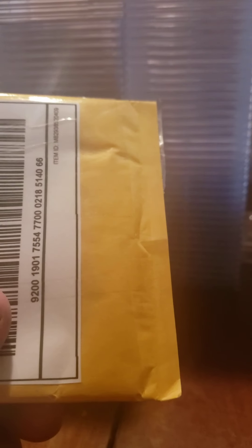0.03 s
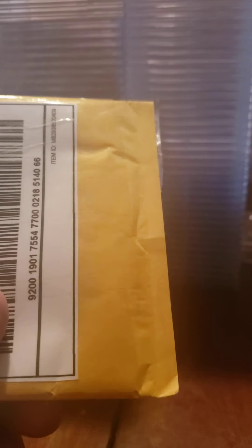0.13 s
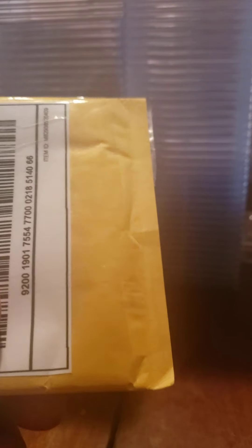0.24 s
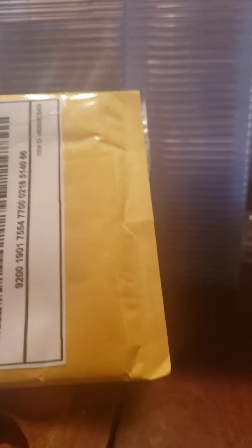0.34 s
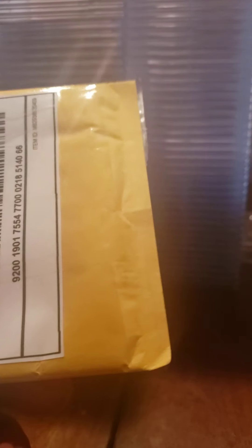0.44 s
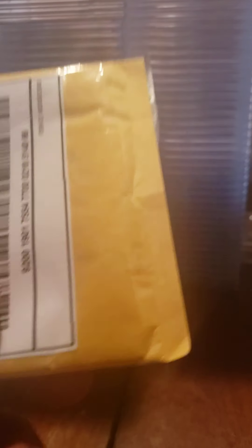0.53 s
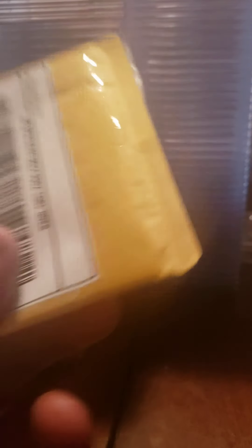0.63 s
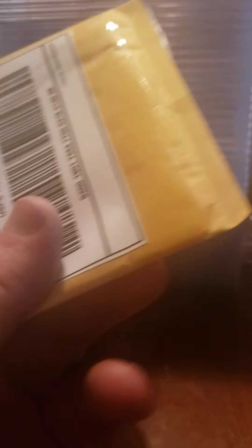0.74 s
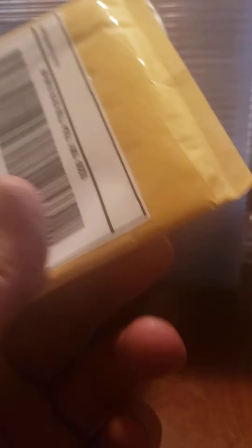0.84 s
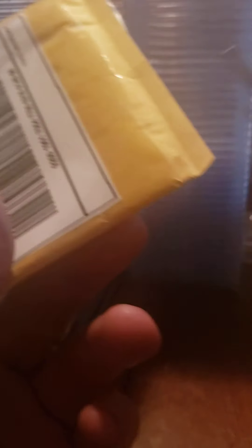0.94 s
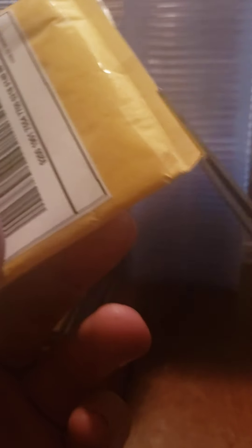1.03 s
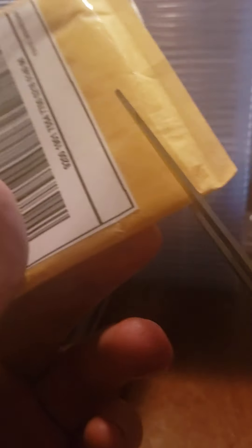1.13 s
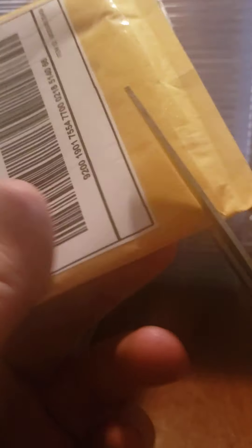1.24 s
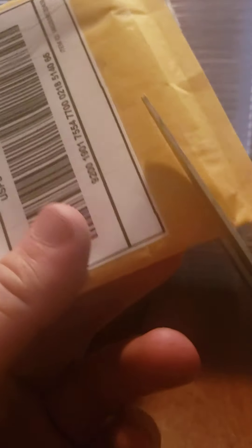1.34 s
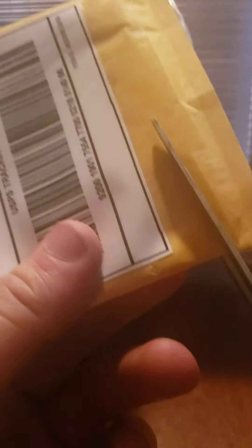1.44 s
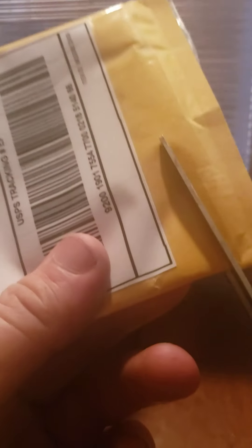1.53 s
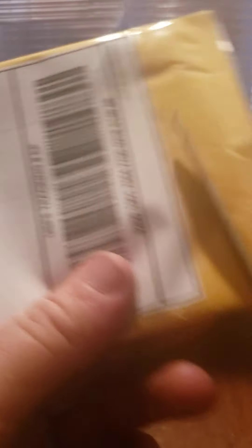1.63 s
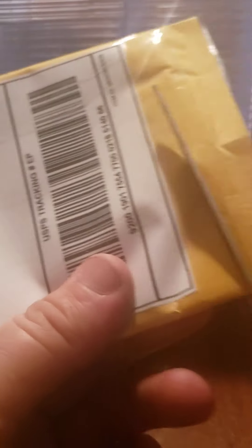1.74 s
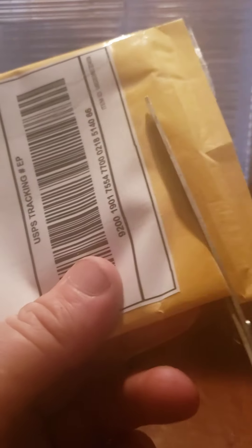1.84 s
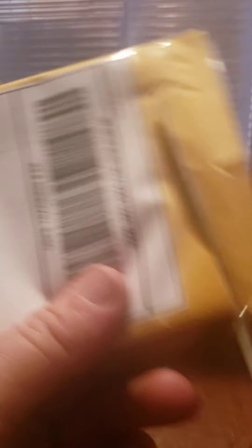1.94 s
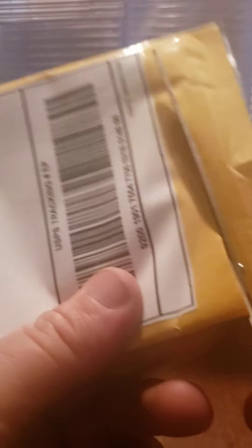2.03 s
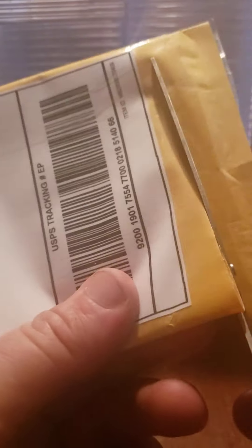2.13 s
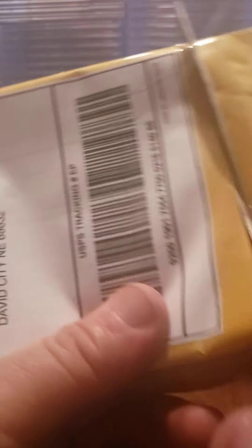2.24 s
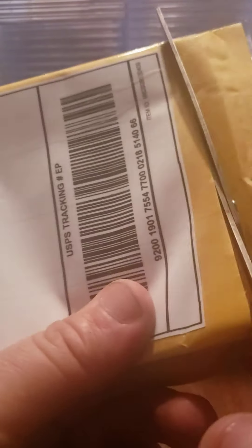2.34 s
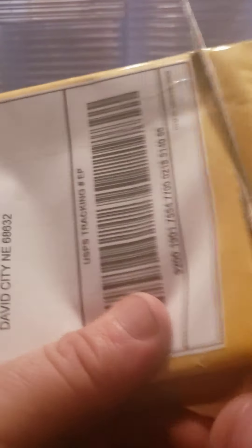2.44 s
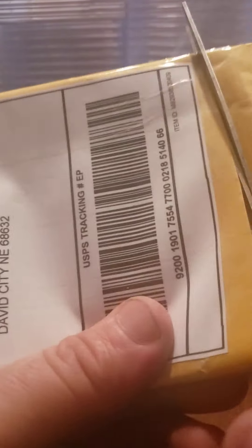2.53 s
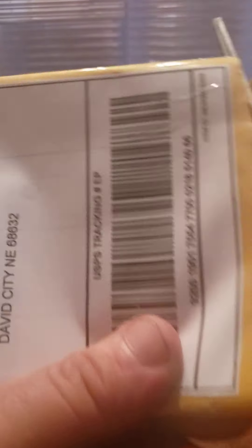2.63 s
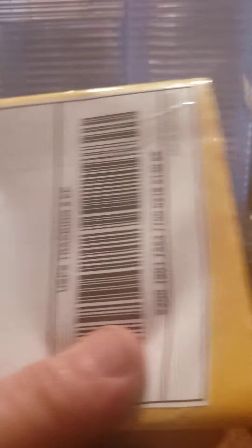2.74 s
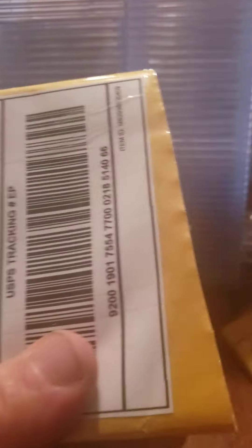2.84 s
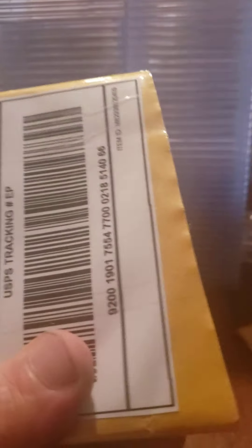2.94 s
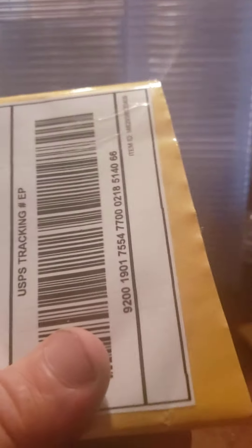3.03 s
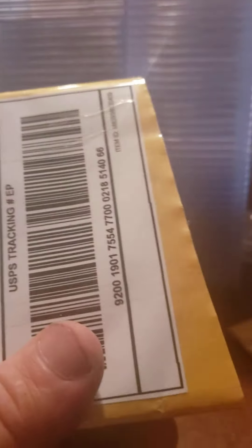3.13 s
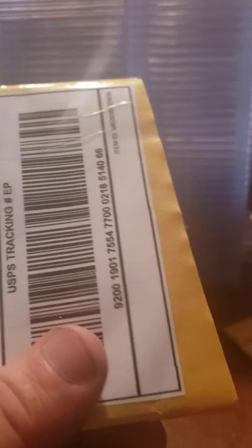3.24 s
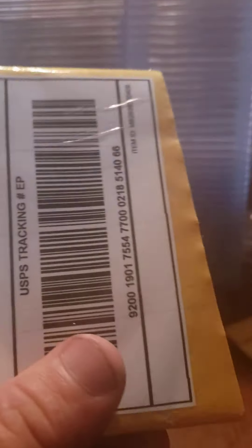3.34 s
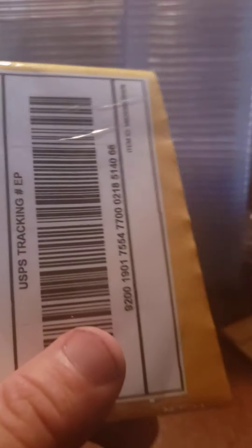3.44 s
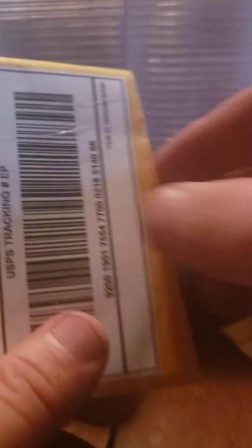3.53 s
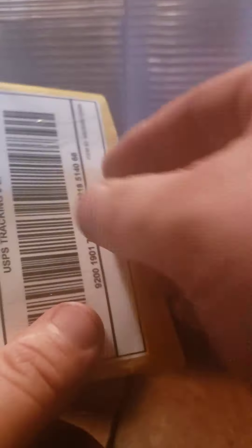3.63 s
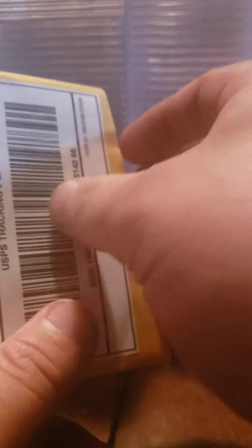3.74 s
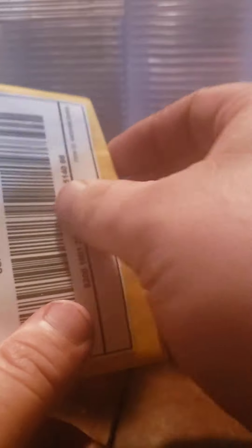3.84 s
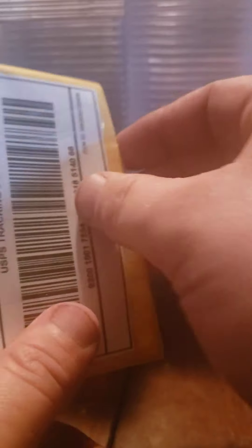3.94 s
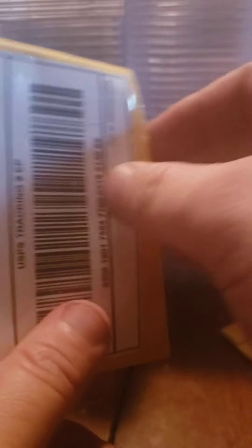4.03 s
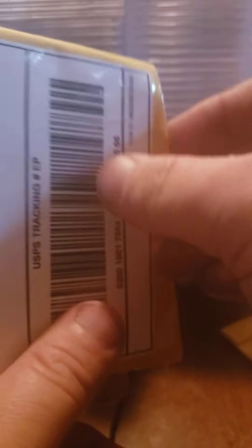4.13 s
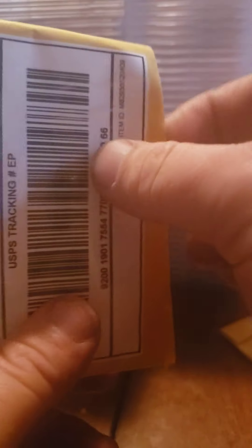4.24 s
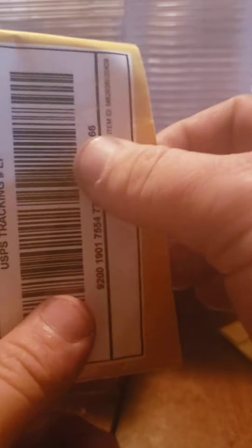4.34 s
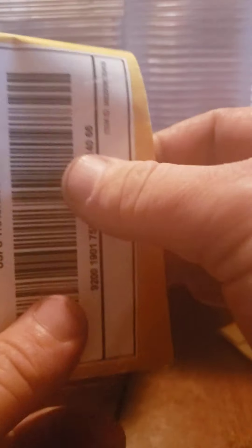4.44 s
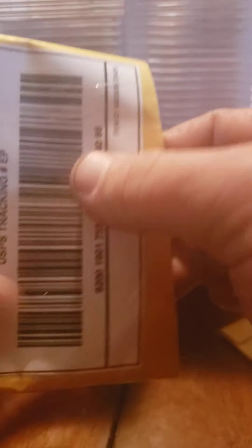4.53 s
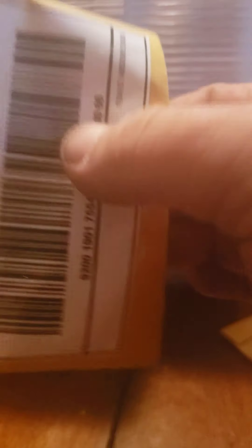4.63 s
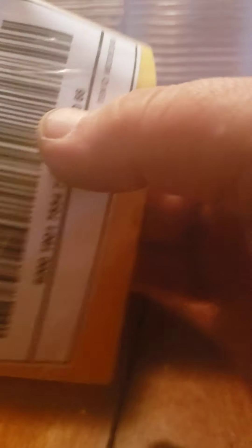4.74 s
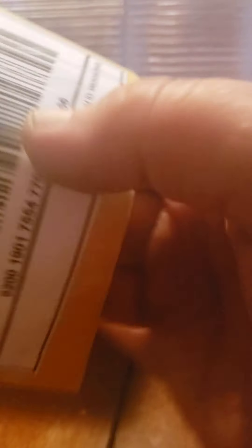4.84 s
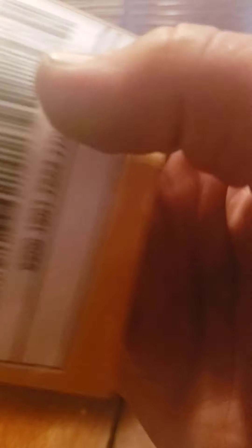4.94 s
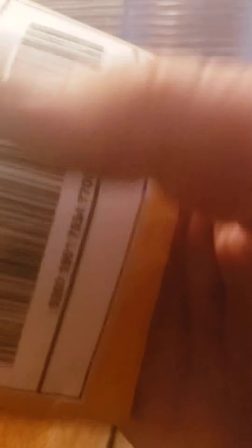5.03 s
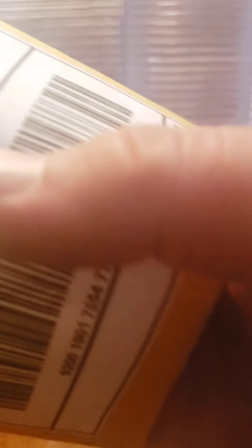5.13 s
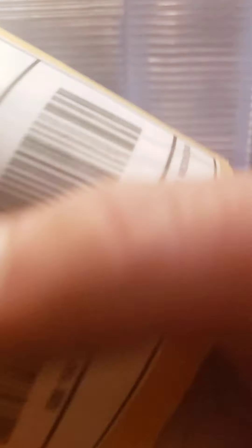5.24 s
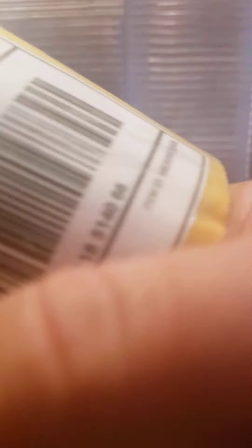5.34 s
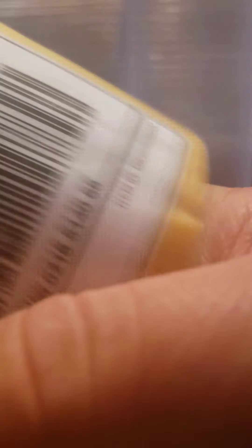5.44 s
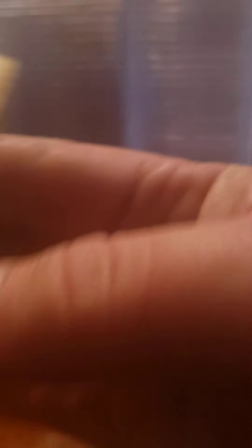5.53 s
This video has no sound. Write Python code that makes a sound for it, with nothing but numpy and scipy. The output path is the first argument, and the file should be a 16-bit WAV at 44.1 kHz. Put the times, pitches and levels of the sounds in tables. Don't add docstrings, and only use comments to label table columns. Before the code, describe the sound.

Scissors snip through a stiff padded paper envelope, clatter down on a wooden table, then hands crinkle and tug the packet in a quiet room.

```python
import sys
import numpy as np
from scipy import signal
from scipy.fft import rfft, irfft, next_fast_len
from scipy.io import wavfile
from scipy.ndimage import uniform_filter1d, map_coordinates

SR = 44100
rng = np.random.default_rng(int(sys.argv[2]) if len(sys.argv) > 2 else 0)


def boost_factor(decibels):
    exponent = np.asarray(decibels, float) / 20
    return 10 ** exponent


def digitize_waveform(pressure):
    field = np.atleast_2d(pressure).T
    bounded = np.clip(field, -1, 1)
    quanta = np.round(bounded * 32767).astype(np.int16)
    wavfile.write(sys.argv[1], SR, quanta)


N = 246253
T = np.arange(N) / SR


def unit(x):
    return x / np.sqrt(np.mean(x ** 2))


def colour(x, points):
    hz, db = np.transpose(points)
    n = next_fast_len(x.shape[-1], True)
    f = np.arange(n // 2 + 1) * SR / n + 1
    gain = boost_factor(np.interp(np.log(f), np.log(hz), db, left=-80))
    return irfft(rfft(x, n) * gain, n)[..., :x.shape[-1]]


def walk(rate):
    k = int(SR / rate)
    steps = np.repeat(rng.standard_normal(N // k + 1), k)
    return 1.2 * uniform_filter1d(steps, k)[:N]


def grains(rate, spread_db, grain_ms, points):
    chance = rng.random((2, N))
    sizes = (chance[0] < rate / SR) * boost_factor(-2 * spread_db * np.log(1.03 - chance[1]))
    pole = np.exp(-2000 / (grain_ms * SR))
    power = signal.lfilter([1], [1, -pole], sizes) + 0.35
    return unit(colour(np.sqrt(power) * rng.standard_normal(N), points))


def ring(modes, push_ms):
    t = np.arange(int(SR * max(mode[2] for mode in modes))) / SR
    y = 0
    for hz, db, t60 in modes:
        decay = np.exp(-np.log(1000) * t / t60)
        y = y + boost_factor(db) * decay * np.sin(2 * np.pi * hz * t + 6 * rng.random())
    y = y * (1 - np.exp(-t * 1000 / push_ms)) ** 2
    return y / np.abs(y).max()


def crack(bright_db, rise_ms, fall_ms):
    ms = np.arange(4096) * 1000 / SR
    shape = np.minimum(ms / rise_ms, 1) ** 2 * np.exp(-np.maximum(ms - rise_ms, 0) / fall_ms)
    bins = rfft(shape * rng.standard_normal(len(ms)))
    burst = irfft(bins / np.abs(bins) ** 0.3) * np.minimum(3 * shape, 1)
    bumps = 2.3 * rng.standard_normal(4)
    y = colour(burst, [(500, -47), (1300, bumps[0]), (2800, bumps[1]), (5500, 0.41 * bright_db + bumps[2]),
                       (9000, bright_db - 2), (13000, bright_db + bumps[3]),
                       (16000, bright_db - 5.5), (17000, -75)])[:2048]
    return y / np.abs(colour(y, [(1400, 0), (7000, 0), (7500, -60)])).max()


def add(track, s, sound):
    i = int(s * SR)
    track[i:i + len(sound)] += sound[:N - i]


# (time [s], rubbing [dB], bending [dB])
HOLDING = [(0, -60, -59), (.618, -65, -63), (.95, -64.5, -65), (1.08, -62, -100), (1.175, -85, -83),
           (1.19, -65, -74), (1.326, -55, -68), (1.4, -53, -72), (1.45, -43.5, -66), (1.6, -67, -91),
           (2.152, -67, -71), (2.78, -56, -65), (3.11, -60.5, -69.5), (3.17, -66.5, -77),
           (3.2, -62.5, -63.5), (3.279, -57.5, -65), (3.55, -73.5, -78), (5.15, -48.5, -52.5),
           (5.58, -47.5, -58)]
# (time [s], length [s], shear [dB], bending [dB])
SCISSOR_STROKES = [(1.446, 0.13, -49.5, -63), (1.472, 0.028, -35.5, -49.5), (1.53, 0.013, -40, -55.5),
                   (1.572, 0.0096, -41, -53.5), (1.656, 0.092, -38, -51.5), (1.775, 0.029, -41, -55.5),
                   (1.812, 0.08, -39, -41.5), (1.984, 0.068, -35.5, -45.5), (2.085, 0.084, -38.5, -41),
                   (2.232, 0.066, -36.5, -43), (2.318, 0.068, -43.5, -45), (2.329, 0.01, -32, -43),
                   (2.479, .031, -42, -48), (2.536, 0.015, -46, -48.5), (2.562, 0.01, -51, -56),
                   (2.578, 0.016, -39, -53.5), (2.61, 0.0083, -42.5, -61), (2.658, 0.05, -66, -47)]
# (time [s], length [s], rubbing [dB], bending [dB])
FINGER_SLIDES = [(0, 0.081, -62.5, -65.5), (.215, 0.019, -58, -54.5), (.252, 0.015, -51, -54),
                 (.305, .018, -48, -47), (.374, 0.053, -51, -51), (.776, 0.053, -54, -62.5),
                 (2.813, 0.058, -67, -66), (2.886, 0.1, -58, -71), (3.021, 0.0088, -45.5, -58),
                 (3.083, 0.022, -73, -64), (3.179, 0.04, -62, -62), (3.614, 0.072, -62, -79),
                 (3.769, 0.091, -62, -67), (3.878, 0.044, -53, -61.5), (3.991, 0.041, -60, -58),
                 (4.052, 0.034, -49.5, -48), (4.098, 0.036, -46, -51), (4.195, 0.059, -60.5, -78),
                 (4.349, .13, -49.5, -49.5), (4.519, 0.081, -61, -52.5), (4.631, 0.045, -52.5, -72),
                 (4.685, 0.097, -51, -60.5), (4.816, 0.13, -48, -50.5), (4.951, 0.091, -44.5, -52.5),
                 (5.103, 0.063, -47.5, -55.5), (5.178, 0.12, -48.5, -51), (5.495, 0.3, -47, -56)]


def motion():
    rise_ms, fall_ms, arch_db = 3.5, 8, 5
    s, rub_db, bend_db = np.transpose(HOLDING)
    held = (rub_db, bend_db, bend_db - 8, bend_db - 7.5)
    level = boost_factor(np.array([np.interp(T, s, db) for db in held]))
    level = level * np.where((T > 3.28) & (T < 3.55), 0.3, 1)
    for strokes, drum_db, body_db in ((SCISSOR_STROKES, 1.5, -16.5), (FINGER_SLIDES, -1, -5)):
        for s, length, rub_db, bend_db in strokes:
            edge = np.minimum((T - s) * 1000 / rise_ms, (s + length - T) * 1000 / fall_ms)
            arch = boost_factor(arch_db * (0.3 - np.clip(2 * (T - s) / length - 1, -1, 1) ** 4))
            peaks = boost_factor(np.array([[rub_db], [bend_db], [bend_db + drum_db], [bend_db + body_db]]))
            level = level + peaks * np.exp(np.clip(edge, -30, 0)) * arch
    return level


# (frequency [Hz], level [dB per Hz])
SHEAR_COLOUR = [(1760, -5), (3000, -1), (4140, 1), (4600, 1), (8870, -5.5), (11600, 1.5), (15100, -1),
                (16200, -34.5), (16500, -47)]
# (frequency [Hz], level [dB per Hz])
CRINKLE_COLOUR = [(900, -37), (1300, 3.5), (1750, 5), (2300, 4), (2700, 5.5), (3500, -1), (4500, -13)]
# (frequency [Hz], level [dB per Hz])
DRUM_COLOUR = [(350, -51.5), (480, -2), (600, 2), (740, 1.5), (900, -1.5), (1050, -8.5), (1400, -12.5)]
# (time [s], level above 9 kHz [dB])
TAPE_SHEEN = [(0, -8), (.22, 0), (.33, -4), (.38, 9), (.42, 3), (.5, -21), (.8, 9.5), (.95, -22), (1.5, -4),
              (1.8, -0.5), (3.8, -5.5), (5.6, -3.5)]


def paper(shear, crinkle, drum):
    jerk = walk(70)
    fibres = grains(1300, 2.7, 0.5, SHEAR_COLOUR)
    sheen = boost_factor(np.interp(T, *np.transpose(TAPE_SHEEN)))
    fibres = fibres + (sheen - 1) * colour(fibres, [(7000, -40), (9500, 0)])
    shear = shear * boost_factor(1.8 * jerk + 1.6 * walk(200) - 0.5) * fibres
    crinkle = crinkle * boost_factor(2.5 * jerk + 2 * walk(120) - 2) * grains(260, 4.2, 0.6, CRINKLE_COLOUR)
    drum = drum * boost_factor(1.5 * jerk + 1.8 * walk(60)) * grains(500, 2, 1.5, DRUM_COLOUR)
    return shear + crinkle, drum


# (time [s], crack [dB], brightness [dB], panel [Hz], panel [dB])
CREASE_SNAPS = [(.2515, -31, 0, 764, -37), (.3105, -38, 9, 750, -39), (.413, -21, 11, 765, -28.5),
                (1.5145, -28, -6, 417, -39.5), (1.546, -39, -7, 497, -42), (1.8396, -23, 4, 824, -22),
                (1.8874, -22.5, -16, 604, -26.5), (2.1223, -20.5, 1, 740, -15.5),
                (2.1421, -17, -13, 698, -17.5), (2.3347, -29, 13, 640, -24), (2.6138, -12.5, 2, 590, -24.5),
                (2.66, -11, -11, 401, -18), (2.6634, -12, 11, 620, -24), (2.8869, -19, -0.5, 895, -36.5),
                (3.0045, -23, -32, 1640, -24.5), (3.1842, -19.5, -9.5, 667, -48),
                (3.1894, -22, -23, 737, -43), (4.129, -28, -7, 795, -29), (4.839, -21, -9, 1430, -39),
                (4.8872, -24.5, -10, 940, -28), (5.1093, -21.5, -7, 1640, -28), (5.222, -21, -26, 680, -38),
                (5.2995, -29, -33, 740, -18.5), (5.381, -23.5, -52, 674, -38)]
# (time [s], level [dB])
SMALL_FOLDS = [(0.213, -43), (0.9453, -47), (1.61, -41), (2.445, -37), (2.6705, -29), (2.8174, -31.5),
               (2.9262, -43), (3.03, -32.5), (3.092, -37.5), (4.1672, -38), (4.3084, -39), (4.633, -32),
               (4.66, -34.5), (4.986, -32)]
# (time [s], level [dB], panel [Hz])
CUTTING_KNOCKS = [(.219, -33, 1500), (0.2561, -42, 740), (0.3125, -38, 795), (.3178, -33.5, 760),
                  (0.39, -35, 1730), (.419, -31, 780), (1.1872, -46.5, 645), (1.2943, -42.5, 600),
                  (1.7378, -31, 680), (1.804, -35, 536), (1.8247, -26.5, 620), (1.853, -18, 674),
                  (1.8712, -18.5, 730), (1.957, -42, 646), (2.0868, -27.5, 630), (2.1013, -26, 670),
                  (2.1681, -29, 620), (2.2727, -19, 580), (2.3757, -34, 395), (2.5423, -33.5, 614),
                  (2.5816, -38, 433), (2.593, -39, 600)]
# (time [s], level [dB], panel [Hz])
PULLING_KNOCKS = [(3.024, -32, 1470), (4.057, -36.5, 865), (4.374, -32.5, 740), (4.4459, -40.5, 436),
                  (4.5397, -31.5, 830), (4.575, -37.5, 740), (4.6953, -38, 720), (4.8202, -33.5, 1530),
                  (4.8545, -28, 970), (4.862, -34, 740), (4.8768, -20.5, 1390), (4.9188, -33.5, 930),
                  (5.0059, -28.5, 750), (5.174, -39, 910), (5.241, -28.5, 846), (5.255, -35, 1560),
                  (5.267, -28.5, 1610), (5.2975, -19.5, 1500), (5.3295, -23.5, 764), (5.3354, -30.5, 840)]
# (time [s], level [dB])
TAPE_TICKS = [
    (0.4783, -39),
    (0.5222, -26),
    (0.9931, -42),
    (1.029, -26),
    (2.9805, -16.5),
    (3.902, -30),
    (4.0118, -40),
    (4.2066, -35),
    (4.2533, -28),
    (5.3594, -45),
]


def creases():
    out = np.zeros(N)
    rows = list(CREASE_SNAPS) + [(s, db, -0.5, 620, db - 15) for s, db in SMALL_FOLDS]
    rows += [(s, db - 8, -2, hz, db) for s, db, hz in CUTTING_KNOCKS]
    rows += [(s, db - 2, -9.5, hz, db) for s, db, hz in PULLING_KNOCKS]
    for s, crack_db, bright_db, hz, panel_db in rows:
        cycles, push_ms, lead_ms = 10, 0.8, 0.6
        if SCISSOR_STROKES[0][0] < s < SCISSOR_STROKES[-3][0]:
            cycles, push_ms, lead_ms = 8.1, 5.07, 0.596 * 5.07
            panel_db = panel_db - 2
        panel = ring([(hz, 0, cycles / hz), (hz * 1.212, -6, cycles / hz)], push_ms)
        add(out, s, boost_factor(crack_db) * crack(bright_db, 0.31, 1.8))
        add(out, s - lead_ms / 1000, boost_factor(panel_db) * panel)
    for s, db in TAPE_TICKS:
        add(out, s, boost_factor(db - 19.5) * crack(2.4, 0.051, 0.14))
    return out


# (time [s], blow [dB], brightness [dB], table [dB])
SCISSOR_BLOWS = [
    (3.291, -10, -16, -31),
    (3.3021, 2, -11.5, -18),
    (3.3294, -17, -16.5, -31.5),
    (3.3462, -23.5, -18.5, -43.5),
    (3.3496, -30, -23.5, -21),
    (3.3657, -19, -18, -49.5),
    (3.3772, -20.5, -31.5, -32),
]
# (frequency [Hz], level [dB], t60 [s])
BLADE_MODES = [(1210, -2.5, 0.04), (1530, 4.5, 0.025), (1700, 10.5, 0.059), (1770, 15, 0.048),
               (2300, 6, 0.097), (2750, 15.5, 0.049), (3184, -4, 0.014), (4270, -24, .04), (5470, -25, .02)]
# (frequency [Hz], level [dB], t60 [s])
TABLE_MODES = [(629, 3, 0.035), (740, 1.5, 0.051), (864, 6.5, 0.013), (967, -7, 0.045)]
# (frequency [Hz], level [dB per Hz])
RATTLE_COLOUR = [(180, -30), (300, -9.5), (519, -20.5), (645, -5.5), (2000, -19), (3190, -12.5),
                 (16000, -36)]


def scissors():
    out = np.zeros(N)
    for s, blow_db, bright_db, table_db in SCISSOR_BLOWS:
        add(out, s, boost_factor(blow_db) * crack(bright_db + 5.5, 0.5, 1.9))
        add(out, s, boost_factor(blow_db - 18.5) * ring(BLADE_MODES, 0.85))
        add(out, s, boost_factor(table_db) * ring(TABLE_MODES, 0.094))
    blades = boost_factor(2.5 * walk(120)) * grains(700, 3, 1.5, RATTLE_COLOUR)
    since = T - SCISSOR_BLOWS[1][0]
    chatter = (since > 0) * boost_factor(-31 - 171 * np.abs(since)) * blades
    return colour(out + chatter, [(30, -4.5), (6500, -0.5), (8500, -4.5), (12000, -3.5), (17000, -8.5)])


# (time [s], level [dB], frequency [Hz], t60 [s])
PANEL_TINTS = [(.254, -41, 477, 0.018), (.314, -34, 777, 0.066), (.384, -36, 1930, 0.018),
               (.388, -35, 1700, .012), (0.394, -33, 2070, 0.01), (.398, -35, 1890, .012),
               (.403, -50, 2200, 0.011), (.4145, -28, 760, 0.066), (0.412, -31, 2770, .008),
               (0.4123, -21, 11630, 0.0063), (2.5945, -29, 7450, 0.0066), (2.6134, -16, 4740, 0.015),
               (2.618, -30.5, 2520, 0.018), (2.6645, -11, 1930, 0.0037), (2.8865, -41, 850, 0.022),
               (2.8869, -37, 1710, .012), (2.908, -47.5, 516, 0.018), (3.004, -37, 733, 0.031),
               (3.027, -35, 1580, 0.019), (3.052, -51, 756, 0.083), (3.086, -46.5, 770, 0.045),
               (3.1848, -29, 4130, 0.01), (3.1836, -33.5, 2300, 0.01), (3.186, -38, 740, 0.063),
               (3.347, -23, 3140, 0.013), (3.359, -32, 800, 0.027), (3.366, -28, 6460, 0.013),
               (3.386, -28.5, 1500, 0.027), (4.009, -42, 910, .03), (4.068, -51, 2900, .012),
               (4.124, -33, 375, 0.044), (4.19, -44, 250, 0.017), (4.234, -47, 600, 0.02),
               (4.342, -42.5, 296, 0.035), (4.394, -41, 296, 0.031), (4.42, -55, 324, 0.03),
               (4.46, -41, 2480, .01), (4.582, -38, 796, 0.011), (4.838, -27.5, 2530, 0.016),
               (4.887, -29, 2750, .012), (4.93, -38, 2090, .012), (4.953, -41, 960, 0.073),
               (5.002, -35, 342, .04), (5.108, -21, 3020, 0.01), (5.137, -35.5, 910, 0.027),
               (5.152, -50, 405, 0.025), (5.187, -35, 1610, 0.013), (5.221, -31, 2420, 0.016),
               (5.278, -32, 910, 0.008), (5.381, -33, 2400, 0.0068)]
# (time [s], level [dB], frequency
# [Hz], t60 [s])
BREAK_TINTS = [(.4132, -21, 13200, 0.0054), (.4075, -21, 12500, .008), (1.451, -37, 2560, 0.02),
               (1.48, -32, 2710, 0.013), (1.514, -31, 4600, 0.013), (1.546, -32, 2580, 0.014),
               (1.8, -38, 2700, 0.018), (1.838, -25, 2630, 0.017), (1.8385, -23, 1220, 0.01),
               (1.851, -34, 2600, .012), (1.869, -31.5, 2480, 0.013), (1.887, -36, 2600, .012),
               (1.998, -32, 940, 0.024), (2.111, -27, 1060, .02), (2.123, -26, 1500, 0.011),
               (2.243, -29, 5100, 0.011), (2.273, -35, 3370, 0.0096), (2.335, -32, 5000, .012),
               (2.342, -32, 3700, 0.016), (2.36, -38, 330, 0.048), (2.6645, -17, 12300, 0.0088),
               (3.3025, -17.5, 3430, 0.0096), (3.305, -18, 800, 0.038), (4.129, -53, 2420, 0.0088),
               (4.167, -51, 4740, .01), (4.206, -51, 3570, .01), (4.54, -40, 2070, 0.015),
               (4.575, -41, 2100, 0.011), (4.633, -43, 2120, 0.0092), (4.665, -41, 2200, .012),
               (4.129, -37, 1350, 0.014), (5.067, -40, 1900, 0.01), (5.205, -47, 1620, .01),
               (5.289, -29, 1600, 0.011), (5.51, -40.5, 330, .03), (5.515, -34.5, 1700, 0.013)]
# (time [s], level [dB])
FAINT_FIBRES = [(0.2904, -37), (0.894, -54), (0.9331, -50), (1.0397, -48), (1.053, -62), (1.066, -62),
                (1.076, -60), (1.094, -64), (1.114, -54), (1.1866, -49), (1.208, -66), (1.2969, -41),
                (1.337, -49), (1.373, -57), (1.403, -48), (1.4225, -36), (2.941, -34.5), (2.954, -46),
                (3.024, -31), (3.071, -51), (3.277, -44)]


def tints():
    out = np.zeros(N)
    for s, db, hz, t60 in list(PANEL_TINTS) + list(BREAK_TINTS):
        side_t60 = min(t60, 0.009)
        modes = [(hz, 0, 1.04 * t60), (hz * 1.077, -4, side_t60), (hz / 1.16, -6, side_t60)]
        add(out, s, boost_factor(db) * ring(modes, 0.39))
    for s, db in FAINT_FIBRES:
        add(out, s, boost_factor(db) * crack(0, 0.2, 0.51))
    return out


def pops(bend):
    pops_per_s, pop_db, middle_hz, cycles = 220, 6.5, 1500, 6.2
    out, t = np.zeros(N), np.arange(SR // 50) / SR
    for when, size, pitch in rng.random((int(pops_per_s * N / SR), 3)):
        hz = middle_hz * 6 ** (pitch - 0.5)
        blip = np.exp(-np.log(1000) * t * hz / cycles) * np.sin(2 * np.pi * hz * t)
        level = bend[int(when * N)] * boost_factor(pop_db - 3 * np.log(1.02 - size))
        add(out, when * N / SR, level * blip)
    return out


# (time [s], level [dB], frequency [Hz])
FACE_THUMPS = [(0.413, -37, 146), (0.678, -42.5, 125), (1.861, -46, 59.8), (2.141, -39, 74),
               (2.324, -41.5, 322), (2.613, -30, 138.4), (2.66, -38.5, 58.4), (2.66, -23.5, 151),
               (3.301, -46.5, 82.7), (3.345, -38, 317), (4.128, -36.5, 121), (4.378, -40.5, 52.2),
               (4.661, -36, 318), (4.872, -29.5, 127), (4.932, -38.5, 81.5), (5.028, -34, 68),
               (5.114, -32, 70.5), (5.2, -32, 130), (5.298, -35, 97), (5.377, -33, 114), (5.516, -40.5, 65),
               (1.183, -48, 71.5), (1.306, -54, 63), (1.492, -47, 63), (4.412, -43.5, 63.3),
               (5.001, -30.5, 68.6)]


def thumps(cycles):
    out = np.zeros(N)
    for s, db, hz in FACE_THUMPS:
        modes = [(hz, 0, cycles / hz), (68, -9, 0.09), (190, -4, 0.05), (320, -5, 0.04)]
        add(out, s, boost_factor(db) * ring(modes, 4))
    return colour(out, [(25, -30), (52, 0)])


# (frequency [Hz], level [dB per Hz])
PADDING_COLOUR = [(130, -30), (250, 5), (400, 1), (520, -19)]


def padding(level):
    return level * boost_factor(2.5 * walk(40)) * grains(300, 2.5, 3, PADDING_COLOUR)


# (time [s], level [dB])
PACKET_WAG = [(0, -73.5), (.75, -53.5), (1.3, -82), (1.5, -63.5), (1.95, -67), (2.2, -60.5), (2.7, -64),
              (2.85, -64), (3.1, -63.5), (3.6, -65.5), (3.95, -68), (4.1, -59), (4.35, -57), (4.95, -53.5),
              (5.25, -50), (5.58, -62)]
# (frequency [Hz], level [dB per Hz])
FLAP_COLOUR = [(20, -21.5), (45, -25), (68, -0.5), (95, -3), (135, -3), (250, -7.5), (400, -11.5),
               (600, -28)]


def flap():
    wag_db = np.interp(T, *np.transpose(PACKET_WAG))
    return boost_factor(wag_db + 1.4 * walk(25)) * grains(150, 1.5, 6, FLAP_COLOUR)


def ports(x, lag, pan_db, wander):
    n = np.arange(N)
    lag = lag + wander * walk(45)
    return np.array([map_coordinates(x, [n - side * lag / 2], order=3) * boost_factor(side * pan_db / 2)
                     for side in (1, -1)])


def close(x, lag, pan_db):
    return ports(x, lag, 1.3 * pan_db, 8.2) + room(x, -16, 0.76)


# (frequency [Hz], t60 [s])
ROOM_DECAY = [(100, 0.25), (700, 0.26), (3000, 0.28), (5000, 0.29), (9000, 0.23), (16000, 0.16)]


def room(x, wet_db, gap_ms):
    t = np.arange(SR // 2) / SR
    room_hz, room_t60 = np.transpose(ROOM_DECAY)
    tail = 0
    for hz in 80 * 2 ** np.arange(0, 8, 0.5):
        t60 = np.interp(np.log(hz), np.log(room_hz), room_t60)
        shape = [(hz / 2, -30), (hz / 1.1, 0), (hz * 1.1, 0), (hz * 2, -30)]
        band = colour(rng.standard_normal((2, len(t))), shape)
        tail = tail + band * np.exp(-np.log(1000) * t / t60)
    tail = tail * np.clip(t * 1000 / gap_ms - 1, 0, 1)
    tail = tail / np.sqrt(np.sum(tail[0] ** 2))
    return boost_factor(wet_db) * signal.fftconvolve(x[None], tail, axes=1)[:, :N]


# (frequency [Hz], level [dB per Hz])
AIR_COLOUR = [(15, -35), (25, -1), (313, 13), (433, -16), (878, -43.5), (2600, -0.5), (6920, -14.5),
              (14400, -41.5), (16500, -22)]


def air():
    return boost_factor(-72 + 0.5 * walk(4.2)) * unit(colour(rng.standard_normal((2, N)), AIR_COLOUR))


# (time [s], left lags right by [samples], left minus right [dB])
PACKET_PLACE = [(0, 14.5, -0.5), (.5, 22.5, -2.5), (.6, 16.5, 2.5), (.95, 20.5, 1.5), (1.15, -9.5, 6),
                (1.9, -6, 6), (2.2, -15.5, 6), (2.7, -9.5, 8), (2.9, -8, -2.5), (3.599, -7, 3.5),
                (4.201, -12.5, 2.5), (5.6, -7, 6)]


def scene():
    s, lag, pan_db = np.transpose(PACKET_PLACE)
    lag, pan_db = np.interp(T, s, lag), np.interp(T, s, pan_db)
    *levels, soft = motion()
    edge, drum = paper(*levels)
    far_side, _ = paper(*levels)
    cracks, steel = creases(), scissors()

    near = ports(boost_factor(-2.5) * edge + cracks, lag, 0.6 * pan_db, 3.5)
    far = ports(boost_factor(-4) * far_side, 0.3 * lag, 0.6 * pan_db, 4)
    body = ports(drum + padding(soft) + flap() + thumps(6.8), 0.65 * lag, pan_db, 1.2)
    sway = boost_factor(-12) * (flap() + padding(soft)) + boost_factor(-10) * thumps(5)
    body = body + sway * np.array([[1], [-1]])
    fall = ports(steel, 11, -2.5, 1.5) + boost_factor(-5) * ports(steel, -3, 0, 1.5)
    small = ports(pops(levels[1]), lag, pan_db, 1.7) + close(tints(), lag, pan_db)

    steel_in_room = colour(steel, [(50, 4), (2000, 3), (5000, -5), (16000, 4)])
    tails = room(edge + drum + cracks, -13, 0.19) + room(steel_in_room, -9, 1.8)
    return near + body + far + fall + small + tails + air()


def top_cut(x):
    return signal.sosfilt(signal.butter(12, 16830, fs=SR, output="sos"), x)


# (frequency [Hz], level [dB])
PHONE_TOP = [(1, 0), (16700, 0), (16900, -70)]


def record(dry):
    rounded = 0.89 * np.tanh(dry / 0.91)
    return top_cut(colour(rounded, PHONE_TOP))


dry = scene()
out = record(dry)
digitize_waveform(out)
```